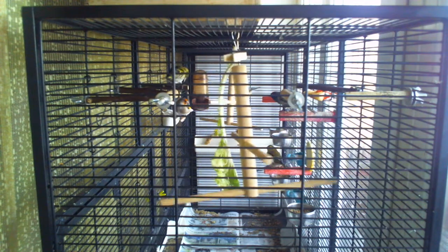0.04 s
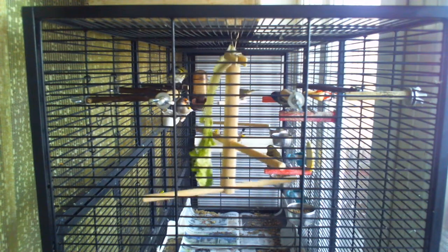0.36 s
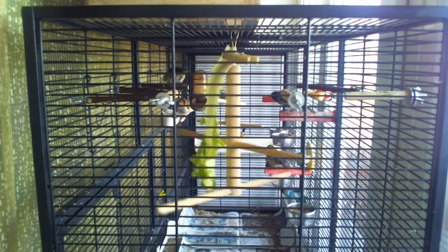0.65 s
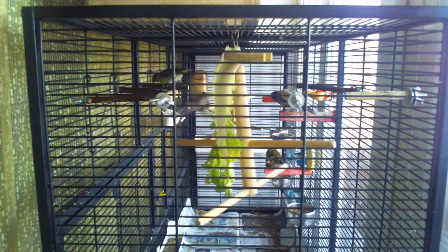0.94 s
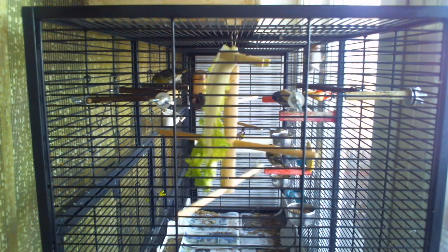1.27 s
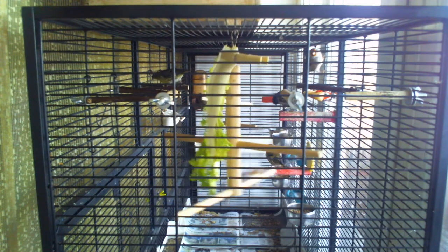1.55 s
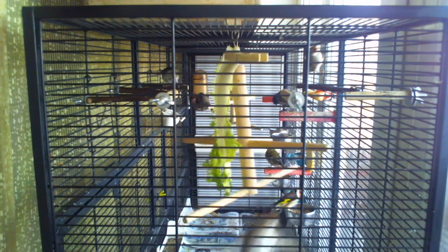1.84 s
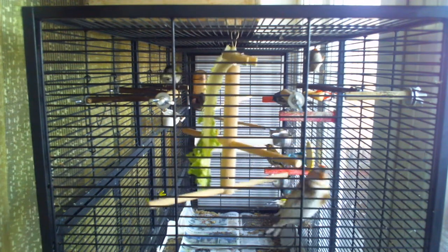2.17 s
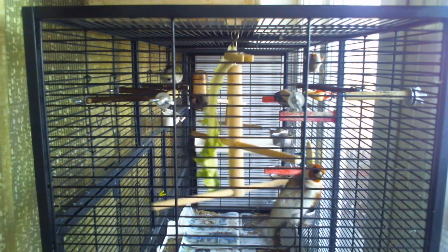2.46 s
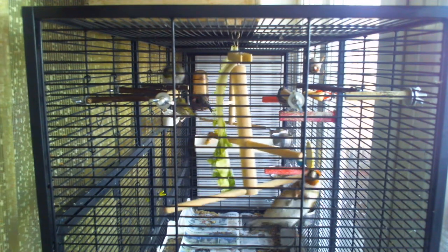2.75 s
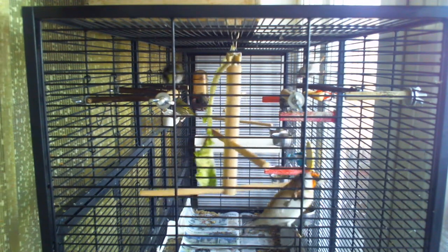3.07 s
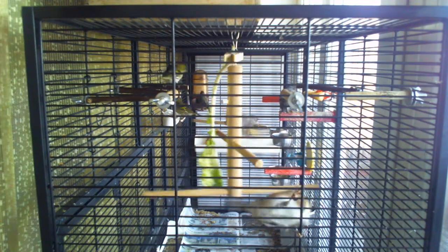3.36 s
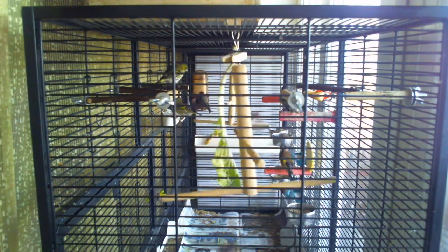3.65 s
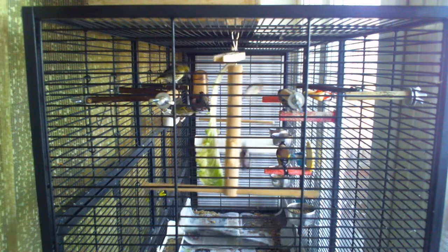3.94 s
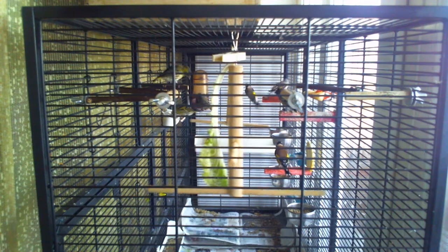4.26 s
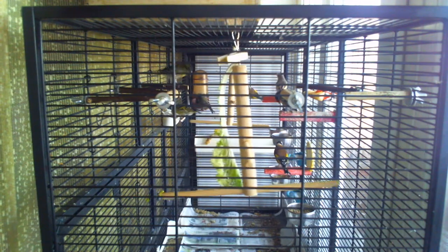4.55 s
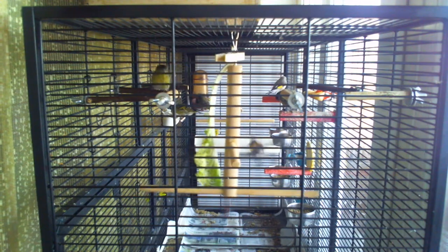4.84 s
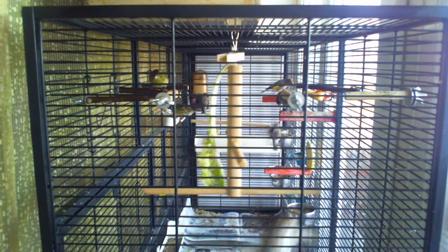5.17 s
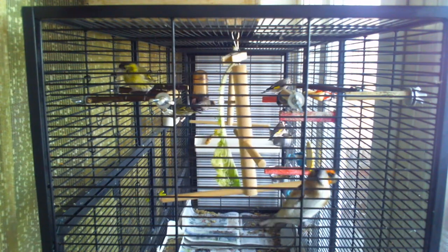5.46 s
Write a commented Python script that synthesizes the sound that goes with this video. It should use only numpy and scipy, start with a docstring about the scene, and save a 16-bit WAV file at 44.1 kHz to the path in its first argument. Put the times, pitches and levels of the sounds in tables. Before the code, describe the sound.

Small caged birds give short, high chirps, with wing flutters, soft thuds and light taps on wire bars.

```python
"""A small room with finches in a wire cage. With the syrinx (a bird's voice box) they make short,
mostly rising chirps, some with two voices at once, and reedy contact calls that share one shape.
Their wings push air and rub feathers; they land with soft thuds, and tap and scrape the bars,
which ring. A faint low throb, with a few stronger beats, and a little hiss lie underneath."""
import sys
import numpy as np
from scipy import signal
from scipy.fft import rfft, irfft, next_fast_len
from scipy.io import wavfile
from scipy.ndimage import map_coordinates

SR = 44100
rng = np.random.default_rng(int(sys.argv[2]) if len(sys.argv) > 2 else 0)


def file_out(sig):
    """Save sig as 16-bit WAV at sys.argv[1]."""
    # one column per channel
    cols = np.atleast_2d(sig).T
    # limit, then scale
    lim = np.clip(cols, -1, 1)
    pcm = np.round(lim * 32767).astype(np.int16)
    wavfile.write(sys.argv[1], SR, pcm)


N = 242991
T = np.arange(N) / SR
# tone colour of dry rubbing, for feathers and claws: f/Hz, level/dB
RUSTLE_COLOUR = [(200, -58), (800, -12.5), (1450, -7.5), (2100, 3.5), (3300, -3), (4500, -1), (5600, 3.5),
                 (6600, -5.5), (7600, -18.5), (10200, -26), (12000, -43), (15000, -41)]


def undb(db):
    """Turn decibels into a factor to multiply by."""
    return 10 ** (np.asarray(db) / 20)


def unit(x):
    """Scale a sound to an average strength (rms) of 1."""
    return x / np.sqrt(np.mean(x ** 2) + 1e-20)


def colour(x, points, tilt_db=0):
    """Shape the tone along (f/Hz, level/dB) points, tilted by tilt_db per octave around 3 kHz."""
    size = next_fast_len(len(x) + 4096) // 2 * 2
    octave = np.log2(np.maximum(np.fft.rfftfreq(size, 1 / SR), 10))
    hz, db = np.transpose(points)
    gain_db = np.interp(octave, np.log2(hz), db) + tilt_db * np.clip(octave - np.log2(3000), -2, 2)
    # build the filter so that it never rings before the sound arrives
    cepstrum = irfft(gain_db * np.log(10) / 20)
    cepstrum[1:size // 2] *= 2
    cepstrum[size // 2 + 1:] = 0
    return irfft(rfft(x, size) * np.exp(rfft(cepstrum)))[:len(x)]


def resonate(x, hz, width_hz):
    """Let one band of pitches through, as a ringing object does."""
    return signal.lfilter(*signal.iirpeak(hz, hz / width_hz, fs=SR), x)


def resonate_twice(x, hz, width_hz):
    """The same band with steeper sides."""
    return resonate(resonate(x, hz, width_hz), hz, width_hz)


def fade(t, t60):
    """Hold at 1 until t = 0, then die away by 60 dB every t60 seconds."""
    return np.exp(-np.log(1000) * np.maximum(t, 0) / t60)


def walk(rate, size):
    """A smooth random wander of about 1 either way, with rate steps a second."""
    steps = rng.standard_normal(4096)
    return map_coordinates(steps, [np.arange(size) * rate / SR], order=3, mode="mirror")


def grains(size, spread_db):
    """Dense tiny clicks of uneven strength."""
    return unit(rng.standard_normal(size) * undb(spread_db * walk(900, size)))


def add(out, start, x):
    """Mix x into out at a time in seconds."""
    i = max(int(start * SR), 0)
    out[i:i + len(x)] += x[:N - i]


def background(throb_hz=23.86, throb_db=-62, throb_t60=0.013, hiss_db=-73):
    """A low throb of soft, uneven beats, with a steady hiss and a faint thin whine."""
    # tone colours of the throb and the hiss: f/Hz, level/dB
    throb_colour = [(25, -38.5), (50, -30), (80, -5.5), (130, 2.5), (190, 6), (270, -4.5), (370, -2.5),
                    (520, -19), (1000, -37), (3000, -78.5)]
    hiss_colour = [(30, -11.5), (100, 5), (250, 7.5), (450, 9), (750, 3.5), (1300, 2.5), (1700, -3),
                   (3200, -5.5), (4500, -4), (6200, -12), (7600, -17), (10000, -16), (12500, -20),
                   (15500, -15.5)]
    # thin high tones: f/Hz, width/Hz, level/dB
    whines = [(3900, 410, -94.5), (4940, 150, -100), (6000, 200, -85), (8050, 25, -91)]
    # slow rise and fall of hiss and whine: t/s, gain/dB
    drift = [(0, -1), (.7, -0.5), (1.2, 2.5), (5.5, 0.5)]
    since_beat = (T - 0.0071) % (1 / throb_hz)
    beats = (0.15 + fade(since_beat, throb_t60)) * undb(2 * walk(9.2, N))
    throb = undb(throb_db) * unit(colour(beats * rng.standard_normal(N), throb_colour))
    hiss = undb(hiss_db) * unit(colour(rng.standard_normal(N), hiss_colour))
    whine = sum(undb(db) * unit(resonate(rng.standard_normal(N), hz, width)) for hz, width, db in whines)
    return throb + (hiss + whine) * undb(np.interp(T, *np.transpose(drift)))


def squeaks(width_hz=900):
    """Faint high squeaks: narrow bands of hiss that swell and fade."""
    # squeaks: t/s, length/s, f/Hz, level/dB
    events = [(2.558, .05, 14000, -85.5), (2.54, 0.11, 9400, -73.5), (3.512, 0.037, 11000, -74),
              (4.689, 0.051, 9530, -66), (5.19, .035, 9700, -60)]
    out = np.zeros(N)
    for start, length, hz, db in events:
        hiss = unit(resonate_twice(rng.standard_normal(int(length * SR)), hz, width_hz))
        add(out, start, undb(db) * np.hanning(len(hiss)) * hiss)
    return out


def frame_drone(wander=0.033, flicker_db=3, buzz_db=-4, edge_s=0.025):
    """The shaken cage frame hums unevenly on one of its own low notes."""
    # hums: t/s, length/s, f/Hz, level/dB
    drones = [(1.504, 0.46, 368, -55.5), (1.95, 0.16, 367.6, -55), (2.082, 0.1, 360, -50.5),
              (2.169, 0.256, 360, -65), (4.34, 0.21, 168, -56.5)]
    out = np.zeros(N)
    for start, length, hz, db in drones:
        t = T[:int(length * SR)]
        pitch = hz * (1 + wander * walk(60, len(t)))
        tone = np.sin(2 * np.pi * np.cumsum(pitch) / SR)
        grit = undb(flicker_db * walk(35, len(t))) + undb(buzz_db) * walk(137.8, len(t))
        soft_ends = np.clip(np.minimum(t, length - t) / edge_s, 0, 1)
        add(out, start, undb(db) * unit(tone * grit) * soft_ends)
    return out


def scrapes(swell_s=0.019, contact_db=3, sing_db=-21, sing_t60=0.43, sing_width_hz=70):
    """A claw sticks and slips along a bar. High notes die first, and the bars sing on faintly."""
    # claw slides: t/s, fade time at 3 kHz/s, level/dB, treble tilt/(dB per octave), rubbing/dB
    slides = [(0.09, 0.055, -63, -19, -2), (0.122, 0.1, -52, -27, -2), (0.786, 0.11, -56.5, -10, 22),
              (0.961, 0.36, -65, -10.5, 30), (1.942, 0.41, -42, 1.5, -36), (2.417, 0.41, -63.5, -8, 0),
              (2.517, 0.84, -62.5, 0.5, -8), (2.612, 0.095, -53.5, -2.5, 1), (2.776, 0.84, -63, 3.5, 1),
              (2.866, 0.21, -52, 5, 3.5), (3.508, 0.26, -49.5, 16, 6), (4.158, 0.19, -52.5, 3, 32),
              (4.249, 0.17, -55, -0.5, 7.5), (4.699, 0.11, -55.5, 13.5, -6), (4.782, 0.047, -60, -.5, 13),
              (5.39, 0.27, -69.5, 1, 1.5)]
    # notes the bars ring with: f/Hz, width/Hz, level/dB
    bar_notes = [(892, 380, -7.5), (1239, 73, -0.5), (2097, 450, -1), (2285, 120, -7.5), (3310, 220, -4),
                 (3763, 730, -4), (5148, 430, -4), (5880, 120, -2), (5500, 326, 3.5), (6440, 49, 7),
                 (8215, 550, -15), (8800, 3400, -29)]
    out, t = np.zeros(N), T[:SR // 2]
    for start, t60, db, tilt_db, rub_db in slides:
        slips = grains(len(t), spread_db=4.5)
        shares = undb(contact_db * rng.standard_normal(len(bar_notes)))  # each spot favours other notes
        steady, ring = 0, 0
        for share, (hz, width, bar_db) in zip(shares, bar_notes):
            gain = share * undb(bar_db + tilt_db * np.log2(hz / bar_notes[0][0]))
            note = gain * resonate_twice(slips, hz, width)
            sing = undb(sing_db) * np.std(note) * unit(resonate(note, hz, sing_width_hz))
            life = (3000 / hz) ** 0.2
            ring += note * fade(t - swell_s, t60 * life) + sing * fade(t, sing_t60 * life)
            steady += note
        rub = undb(rub_db) * unit(colour(slips, RUSTLE_COLOUR, tilt_db)) * fade(t - swell_s, t60)
        scrape = (ring / np.std(steady) + rub) / np.hypot(1, undb(rub_db))
        add(out, start, undb(db) * np.minimum(t / swell_s, 1) * scrape)
    return out


def taps(crack_t60=0.082, chatter_t60=0.11, ring_t60=0.12, knock_hz=1750, knock_t60=0.026):
    """Beak or claw hits the cage: a crack and a woody knock. Loose wires chatter and the bar rings."""
    # hits: t/s, level/dB, treble tilt/(dB per octave), ring f/Hz, ring gain/dB
    hits = [(0.128, -64.5, 1, 1220, 17), (0.154, -67.5, 7, 5200, 10), (0.262, -38.5, -4, 2570, -1.5),
            (0.698, -46, 2, 1420, -4), (0.880, -53, 0.5, 2020, -3), (1.057, -54, 3, 5800, -20),
            (1.104, -54.5, 0.5, 5800, -5), (1.156, -64, 7.5, 5800, -12.5), (2.479, -60.5, 3, 3200, 2.5),
            (2.870, -56.5, 10, 5800, 6.5), (3.572, -51.5, 4.5, 5800, -12), (3.972, -38, -0.5, 5400, 2)]
    # tone colour of crack and chatter: f/Hz, level/dB
    wire_colour = [(150, -55), (500, -18), (800, -21.5), (1020, -7.5), (1350, -15), (1720, -8.5),
                   (2250, -2.5), (3200, -4.5), (4400, -6), (5250, -1.5), (6500, -8), (7700, -16),
                   (10000, -20), (15000, -62)]
    out, t = np.zeros(N), T[:SR // 3]
    hardest_db = max(hit[1] for hit in hits)
    for start, db, tilt_db, ring_hz, ring_db in hits:
        life = undb(0.27 * (db - hardest_db))  # softer taps settle sooner
        wires = unit(colour(grains(len(t), spread_db=2.5), wire_colour, tilt_db))
        chatter = wires * fade(t, chatter_t60 * life) / 2
        crack = undb(1) * wires * fade(t, crack_t60) / 2
        knock_gain = undb(-2 * tilt_db)  # dull blows knock more
        knock = knock_gain * np.sin(2 * np.pi * knock_hz * t) * fade(t, knock_t60)
        ring = undb(ring_db) * np.sin(2 * np.pi * ring_hz * t) * fade(t, ring_t60 * life)
        add(out, start, undb(db) * (crack + chatter + knock + ring))
    return out


def thuds(rise_s=0.005, body_db=-8, fade_cycles=6.4):
    """Soft thuds: a tone and dull noise die within a few vibrations, so low ones last longer."""
    # landings, a few stronger beats of the background throb, and dull knocks that go with some taps: t/s,
    # level/dB, f/Hz
    events = [(0.131, -42, 185), (0.7, -40, 1040), (0.848, -43, 175), (0.93, -47, 158), (1.055, -40, 168),
              (1.098, -34, 183.5), (1.216, -42, 166), (1.363, -37.5, 750), (1.518, -37.5, 723),
              (1.573, -38, 213), (1.81, -36, 218), (1.839, -33, 227), (2.818, -44, 164), (2.9, -45.5, 160),
              (3.246, -45.5, 175), (3.419, -37.5, 116), (3.568, -39, 610), (3.611, -35.5, 174),
              (3.729, -40.5, 123), (3.883, -39.5, 167.3), (3.932, -39, 135), (4.044, -32, 201),
              (4.075, -30, 315.6), (4.884, -39, 186)]
    out, t = np.zeros(N), T[:SR // 4]
    for start, db, hz in events:
        body = unit(resonate_twice(rng.standard_normal(len(t)), hz, width_hz=0.83 * hz))
        thud = np.sin(2 * np.pi * hz * t) + undb(body_db) * body
        loudness = np.minimum(t / rise_s, 1) * fade(t - rise_s, fade_cycles / hz)
        add(out, start, undb(db) * thud * loudness)
    return out


def wings(beat_hz=21.67, beat_depth_db=4, takeoff_s=0.00533, settle_t60=0.21):
    """Each wing beat pushes air, swishes and rubs feathers together."""
    # bursts of beats: t/s, length/s, base levels of push/dB, swish/dB and rustle/dB,
    # swish shift/octaves, rustle tilt/(dB per octave)
    flutters = [(1.042, .12, -53, -55.5, -73.5, -0.23, -11), (1.292, 0.053, -52, -48, -55.5, 0.037, 0.5),
                (1.469, 0.045, -55.5, -49.5, -59.5, -0.039, -3), (1.51, 0.059, -52.5, -51.5, -57, .05, 3),
                (1.593, 0.085, -48, -68.5, -63.5, -0.178, 0.5),
                (1.754, 0.097, -48, -59.5, -55.5, 0.088, -2.5), (3.234, .13, -51, -64.5, -66.5, 0.037, 2.5),
                (3.375, 0.13, -47, -54.5, -61.5, -0.097, -2.5),
                (3.568, .13, -47.5, -50.5, -53.5, -0.012, 2), (3.718, 0.11, -57.5, -67, -60.5, 0.02, 0),
                (3.877, 0.12, -45.5, -52, -52, -0.12, 0.5), (3.951, .14, -48.5, -53.5, -52.5, 0.172, 0.5),
                (4.088, 0.065, -59.5, -88, -60.5, -0.27, 2.5), (4.82, 0.15, -48, -55, -65.5, 0.0098, 6),
                (4.877, 0.15, -43, -49, -55.5, -0.11, -5), (5.051, 0.088, -42.5, -48.5, -54.5, -0.0043, -6),
                (5.109, 0.082, -53, -58, -55.5, 0.83, -1)]
    # tone colours of the low push of air and of the swish: f/Hz, level/dB
    push_colour = [(30, -44), (65, -25.5), (110, 0), (185, -3), (260, -3.5), (340, -2.5), (480, -11.5),
                   (900, -51), (3000, -94)]
    swish_colour = [(100, -30.5), (250, -17.5), (400, -11.5), (520, -6), (720, 8), (900, -5.5),
                    (1080, -14.5), (1400, -14), (2500, -57), (6000, -79.5)]
    # hollow notes of tray and cage, which waver as the bird moves: f/Hz, width/Hz, level/dB
    hollows = [(560, 130, -14), (700, 56, -1), (899, 157, -15.5), (1058, 160, 1)]
    out, t = np.zeros(N), T[:SR // 3]
    size = len(t)
    for start, length, push_db, swish_db, rustle_db, octaves, tilt_db in flutters:
        phase = 2 * np.pi * np.cumsum(beat_hz * (1 + 0.13 * walk(9, size))) / SR
        effort = np.minimum(t / takeoff_s, 1) * fade(t - length, settle_t60)
        strokes = effort * unit(undb(-beat_depth_db * np.cos(phase)))
        shift = 2 ** octaves
        air = unit(colour(grains(size, spread_db=5.5), [(hz * shift, db) for hz, db in swish_colour]))
        hollow = sum(undb(db + 4 * walk(30.5, size)) * unit(resonate(air, hz * shift, width))
                     for hz, width, db in hollows)
        lumps = undb(3 * walk(57.2, size))
        swish = undb(swish_db - 0.5) * unit((air + hollow) * lumps)
        push = undb(push_db - 4.5) * unit(colour(grains(size, spread_db=0.5), push_colour))
        rustle = undb(rustle_db + 3) * unit(colour(grains(size, spread_db=-0.5), RUSTLE_COLOUR, tilt_db))
        add(out, start, strokes * (push + swish + rustle))
    return out


def whistle(length, first_hz, last_hz, overtone_db, bend, crest, edge, waver,
            third_db=-7, fourth_db=-10, fifth_db=-30, rasp_db=-25, air_db=-33):
    """One note: the pitch glides and levels off, while a swell of breath brings out high overtones."""
    size = int(length * SR)
    progress = np.linspace(0, 1, size)
    hz = last_hz + (first_hz - last_hz) * (1 - progress) ** bend  # more bend levels off sooner
    phase = 2 * np.pi * np.cumsum(hz * (1 + waver * walk(500, size))) / SR
    phase += undb(rasp_db) * walk(2500, size)  # a fast tremble makes the tone raspy
    arch = np.interp(progress, [0, crest, 1], [0, 0.5, 1])  # the breath peaks at crest
    pressure = np.abs(np.sin(np.pi * arch)) ** edge
    second = undb(9 * (1 - progress))  # strongest at the start, before the throat tunes in
    shares = [second] + [undb(db) * pressure for db in (third_db, fourth_db, fifth_db)]
    rough_phase = phase + undb(-15) * walk(900, size)  # overtones are rougher than the main tone
    overtones = sum(share * undb(2.5 * walk(340, size)) * np.sin(k * rough_phase) * (k * hz < SR / 2)
                    for k, share in enumerate(shares, 2))
    air = undb(air_db) * rng.standard_normal(size)  # swirling air in the syrinx
    return pressure * (np.sin(phase) + undb(overtone_db) * overtones + air)


def finch_calls():
    """The syrinx makes reedy contact calls and purer gliding chirps; the beak colours both."""
    # contact calls: t/s, length/s, top f/Hz, level/dB, rise/share of top f, overtone gain/dB
    peeps = [(1.203, 0.02006, 3016, -30.5, 0.14, -11.5), (1.303, 0.025, 2950, -25.5, 0.045, -12),
             (3.654, 0.032, 3015, -31, .16, -8), (3.889, 0.01956, 2980, -24, .14, -11.5),
             (4.844, .024, 2980, -29, 0.215, -9.5), (4.912, 0.0294, 2940, -34.5, 0.2076, -7.5),
             (4.943, 0.041, 3114, -32, .19, -11), (5.052, 0.022, 2964, -28, 0.099, -6.5)]
    # chirps; overlapping rows are two voices at once, or one chirp that dips and then rises:
    # t/s, length/s, start f/Hz, end f/Hz, level/dB, overtone gain/dB
    chirps = [(0.000, 0.0075, 3130, 3030, -49.5, -21), (0.41, 0.041, 2380, 3423, -39, -33),
              (0.485, 0.01, 1970, 3880, -30, -16.5), (0.487, 0.036, 4670, 5135, -27, -43),
              (1.401, 0.029, 2720, 3700, -23, -16), (1.511, 0.039, 2814, 3770, -22.5, -14),
              (1.624, 0.028, 5590, 5110, -24, -25), (1.627, .019, 6760, 5930, -31.5, -18),
              (1.744, 0.0173, 2300, 2840, -39.5, -9), (1.754, .036, 2750, 3670, -26.5, -14),
              (3.266, 0.015, 2300, 4010, -33.5, -11.5), (3.271, 0.015, 4680, 4810, -34.5, -45),
              (3.405, 0.02508, 3757, 3076, -29, -15.5), (3.416, 0.029, 3114, 3980, -32, -15),
              (3.774, .037, 2565, 4194, -28, -17.5), (4.435, 0.0185, 3230, 4050, -34.5, -18),
              (4.441, 0.024, 2830, 3007, -25.5, -20.5), (4.525, 0.032, 3310, 4280, -39, -21.5)]
    # what the beak lets out: f/Hz, gain/dB
    beak_colour = [(2000, -9), (3100, -0.5), (3550, 1), (4300, -3), (5800, -1.5), (6600, -6), (7800, -12.5),
                   (9000, 1), (10800, -7.5), (12000, -19), (13000, -23.5), (15500, -29)]
    out = np.zeros(N)
    for start, length, top_hz, db, rise, overtone_db in peeps:
        note = whistle(length, top_hz * (1 - rise), top_hz, overtone_db,
                       bend=2.59, crest=0.62, edge=0.74, waver=0.011, third_db=-11, fourth_db=-9)
        add(out, start, undb(db) * note)
    for start, length, first_hz, last_hz, db, overtone_db in chirps:
        note = whistle(length, first_hz, last_hz, overtone_db,
                       bend=1.35, crest=0.61, edge=0.77, waver=0.019, rasp_db=-21)
        add(out, start, undb(db) * note)
    return colour(out, beak_colour)


def room(x, wash_db=-10.5, scatter_t60=0.08, tail_t60=0.21, build_s=0.0025):
    """Sound bounces back as a few hard echoes, scatter from the cage and the room's duller tail."""
    # echoes from tray, wall and window: delay/s, level/dB
    echoes = [(.0021, -22.5), (.0038, -22.5), (.0062, -36.5), (0.011, -21.5)]
    # tone colours of the scatter and of the tail, whose treble the walls soak up: f/Hz, level/dB
    scatter_colour = [(100, 4.5), (600, 0), (3000, 2.5), (6000, 0), (10000, 6), (15000, -3.5)]
    tail_colour = [(100, 10), (600, -3.5), (3000, 5.5), (6000, -2.5), (8000, -3.5), (10000, -9),
                   (15000, -22)]
    t = T[:SR]
    onset = np.minimum(t / build_s, 1) ** 2
    wash = sum(unit(colour(rng.standard_normal(SR), points) * onset * fade(t, t60)) / np.sqrt(SR)
               for points, t60 in ((scatter_colour, scatter_t60), (tail_colour, tail_t60)))
    out = x + signal.fftconvolve(x, undb(wash_db) * wash)[:N]
    for delay, db in echoes:
        add(out, delay, undb(db) * x)
    return out


def scene():
    """Birds and cage echo in the room, over the frame's hum and the background, in one channel."""
    cage = room(finch_calls() + squeaks() + taps() + scrapes() + wings() + thuds())
    return (cage + frame_drone() + background())[None]


def record(dry, bass_hz=44, top_hz=15700):
    """The small microphone loses the deep bass; the recorder cuts the highest treble."""
    thin = signal.sosfilt(signal.butter(4, bass_hz, "high", fs=SR, output="sos"), dry)
    return signal.sosfilt(signal.ellip(10, 0.1, 80, top_hz, fs=SR, output="sos"), thin)


dry = scene()
out = record(dry)
file_out(out)
```